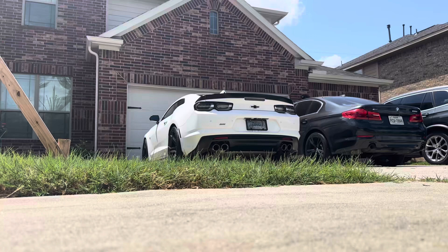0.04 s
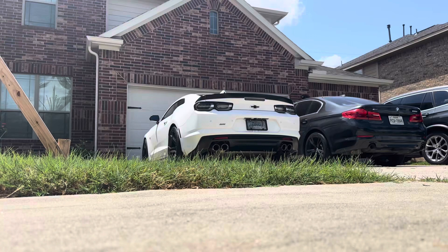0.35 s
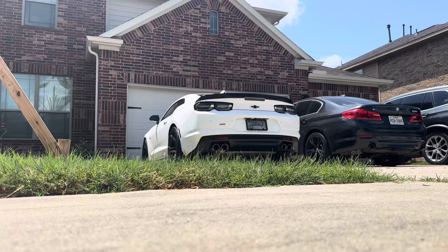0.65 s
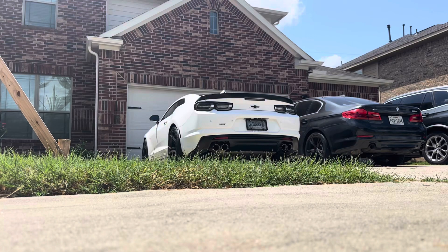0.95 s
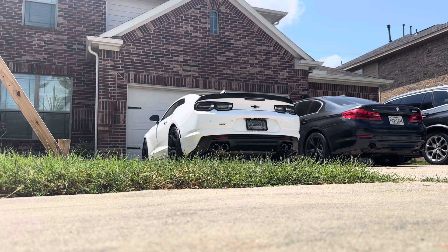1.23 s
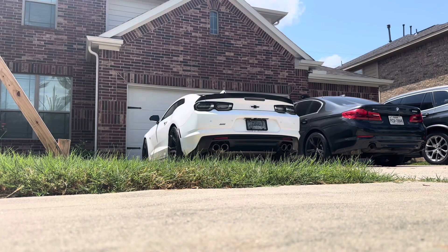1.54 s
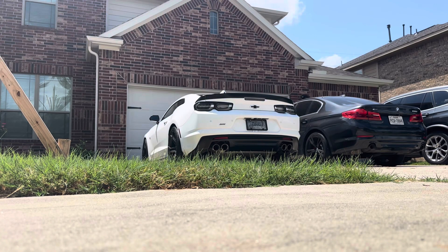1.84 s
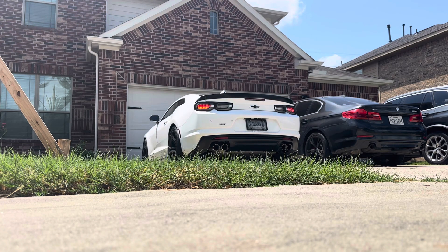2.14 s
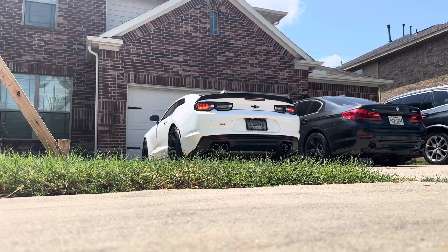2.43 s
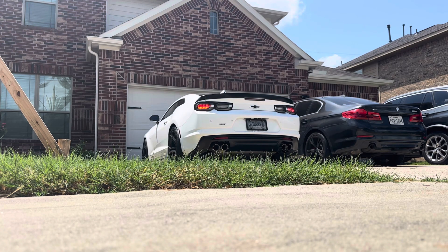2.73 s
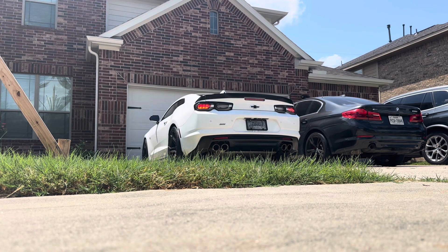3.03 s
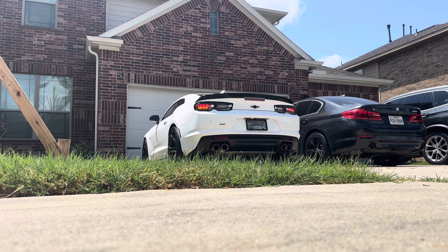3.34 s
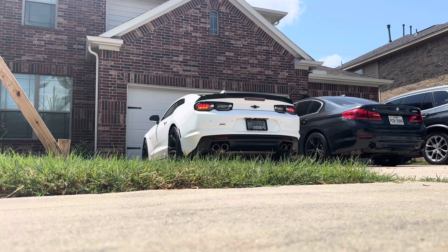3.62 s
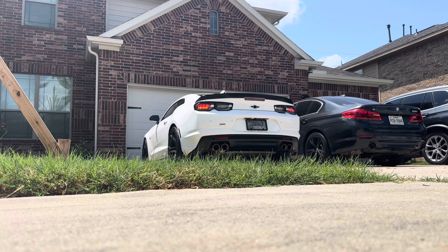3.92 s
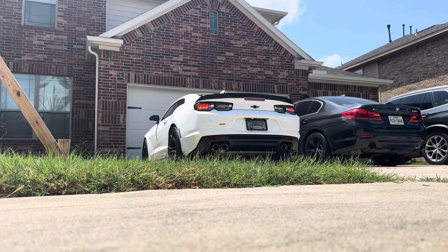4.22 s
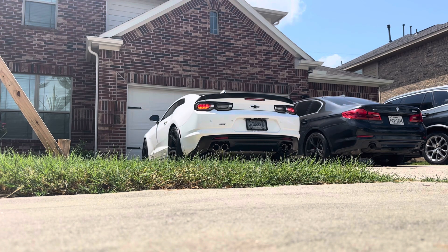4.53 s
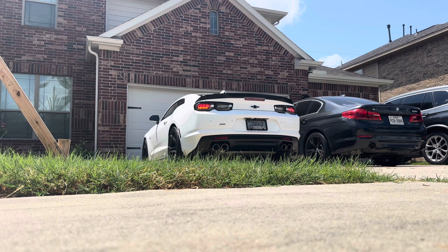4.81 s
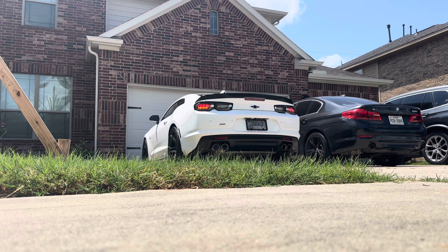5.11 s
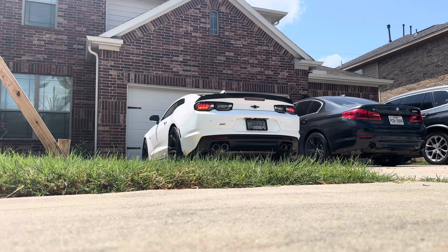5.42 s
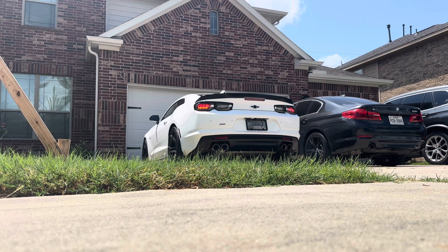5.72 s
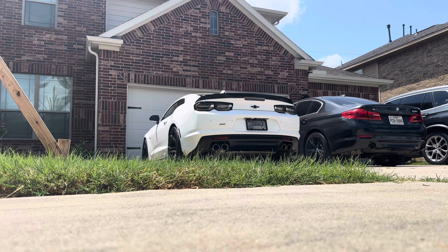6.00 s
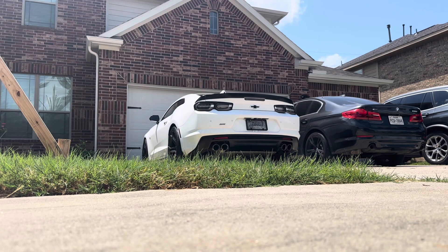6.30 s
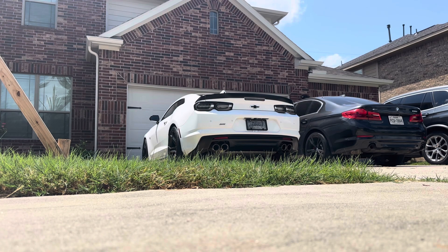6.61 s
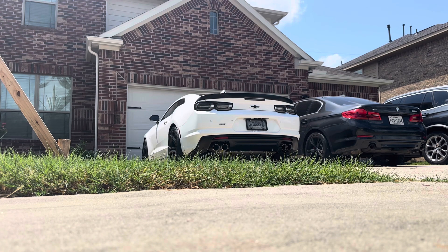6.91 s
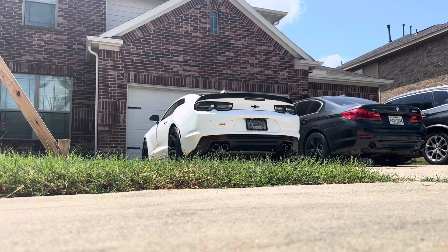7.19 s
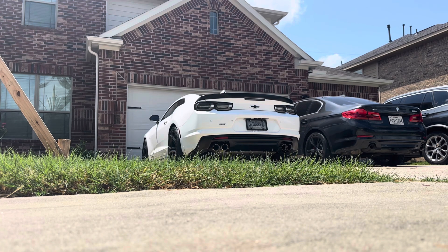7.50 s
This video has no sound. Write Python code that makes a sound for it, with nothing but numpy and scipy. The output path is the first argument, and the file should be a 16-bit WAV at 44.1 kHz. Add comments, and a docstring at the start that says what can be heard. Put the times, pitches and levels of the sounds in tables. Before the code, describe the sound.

For the first three seconds there is only quiet outdoor background: a faint hiss of cicadas and a low rumble of distant traffic, with a small bird chirping softly several times at the start and again near 1 and 2 seconds. At about 3.2 seconds a car's starter clunks in and cranks with a pulsing, grinding whine. At 4 seconds the V8 engine catches with deep thumps and flares loudly, spitting a rapid run of sharp exhaust cracks, loudest around 4.2 seconds. By 5 seconds the revs sink into a deep, burbling fast idle with a slight metallic rasp. The idle swells a little near 5.6 seconds, gives occasional light pops and slowly eases in pitch, still running at the end, around 7.5 seconds. A faint chirp comes near 6.4 seconds. The car is heard from behind in a driveway, with short reflections from nearby walls.

```python
"""A V8 car starts cold in a driveway: the starter clunks in and cranks, then the engine catches,
flares with sharp exhaust cracks and sinks to a burbling fast idle. Each firing sends out a puff
of gas that booms, rings the pipes and rasps; the starter's gear teeth grind and whine.
Brick house fronts throw the sound back. Behind it, cicadas buzz and a small bird chirps
over a faint town rumble."""
import sys
import numpy as np
from scipy import signal
from scipy.fft import rfft, irfft
from scipy.io import wavfile
from scipy.ndimage import uniform_filter1d

SR = 44100
rng = np.random.default_rng(int(sys.argv[2]) if len(sys.argv) > 2 else 0)


def persist_wave(psi):
    """Save psi, clipped to +-1, as 16-bit WAV."""
    counts = np.round(np.clip(psi, -1, 1) * 32767).astype(np.int16)
    wavfile.write(sys.argv[1], SR, np.atleast_2d(counts).T)


N = 332955
TIME = np.arange(N) / SR
FREQ = np.maximum(np.fft.rfftfreq(N, 1 / SR), 1)
SIDES = np.array([[1], [-1]])  # plus for left, minus for right

# tone of distant traffic: pitch_hz, level_db
TOWN_TONE = [(12, -54), (20, -27.5), (37, -10.5), (59, 1), (81, -7), (130, -7), (264, -19), (349, -19),
             (414, -23.5), (451, -24), (1210, -32), (1860, -38.5), (3400, -42), (4420, -75), (7480, -120)]
# tone of the far cicadas: pitch_hz, level_db
FAR_CICADA_TONE = [(2800, -23), (3500, -14), (4200, -3), (5000, -1.5), (6200, 2), (6900, -2), (7200, -3.5),
                   (7800, 0), (8400, -2.5), (9300, -9.5), (10200, -27), (12000, -56.5)]
# tone of the near cicadas: pitch_hz, level_db
NEAR_CICADA_TONE = [(3000, -31.5), (4200, -12), (5100, -7.5), (5550, 0), (6400, -2), (6900, -1.5),
                    (7200, -11), (8200, -6.5), (9300, -18.5), (11000, -53)]
# single cicadas whistling out of the chorus: loudest_s, pitch_hz, level_db
CICADA_WHISTLES = [(0.3, 7526, -78), (1.2, 6250, -73), (2.2, 5286, -78), (2.5, 8565, -80), (3.3, 6968, -72),
                   (3.4, 5855, -68), (3.6, 5373, -72), (3.7, 6245, -68), (3.7, 6880, -73), (3.7, 8016, -74),
                   (5.9, 8048, -72), (6, 5507, -69), (6.3, 6686, -69), (6.5, 5965, -61), (6.6, 6492, -66),
                   (6.9, 6288, -68), (6.9, 6778, -71), (7.1, 5561, -64)]
# the bird's chirps: start_s, length_s, top_pitch_hz, level_db
BIRD_CHIRPS = [(0.103, 0.014, 5280, -58), (0.178, 0.023, 4860, -60), (0.25, 0.023, 4800, -58),
               (0.304, 0.027, 5150, -56.5), (.38, 0.024, 4850, -57), (.945, .025, 4500, -66),
               (1.002, .025, 4600, -64), (1.917, 0.09, 4510, -55), (6.39, 0.07, 4503, -51)]

# the starter spins up, then sags and surges at each compression: time_s, tooth_rate_hz, level_db
STARTER_SPEED = [(3.19, 280, -48.5), (3.25, 479.5, -56), (3.32, 589, -52), (3.36, 621.4, -46.5),
                 (3.43, 587.3, -49), (3.49, 553.7, -44), (3.56, 525, -47.5), (3.635, 515.3, -54),
                 (3.675, 607, -44), (3.76, 539, -46.5), (3.81, 600, -44), (3.895, 545, -46.5),
                 (3.94, 595, -49.5), (4, 570, -45)]
# tones in the starter's whine: multiple_of_tooth_rate, level_db
WHINE_TONES = [(1, -10), (2, -6), (3, -15), (4, -16), (7, -20), (8, -20)]
# song of the starter motor's brushes: time_s, pitch_hz, level_db
BRUSH_SONG = [(3.19, 2700, -75), (3.25, 3650, -57), (3.285, 4800, -63), (3.32, 5520, -61),
              (3.37, 5600, -62), (3.41, 5000, -67), (3.46, 4650, -61), (3.52, 4200, -64), (3.57, 3600, -69),
              (3.63, 3650, -60), (3.69, 4200, -61), (3.73, 3650, -58), (3.77, 3560, -65), (3.81, 3680, -59),
              (3.86, 3630, -59), (3.9, 3550, -67), (4.0, 4000, -65)]
# ring of the housing around the gears: pitch_hz, width_hz, level_db
HOUSING_RING = [(205, 126, 6), (545, 38, 6.5), (690, 42, 6.5), (797, 19, 4), (998, 29, 10), (1137, 31, 6.5),
                (1200, 20, 3), (1370, 15, -8), (1813, 14, 2.5), (2030, 20, -5), (2370, 30, -18),
                (3500, 80, -23)]
# ring of the starter's casing: pitch_hz, width_hz, level_db
CASING_RING = [(215, 190, 3), (507, 130, 2), (790, 120, 1), (1222, 43, 4.5), (1370, 45, 1), (1766, 68, -2),
               (2025, 78, -3.5), (2300, 86, -12), (3670, 590, -16.5)]
# knocks of the starter drive: start_s, level_db, decay_s, brightness_hz
STARTER_KNOCKS = [(3.188, -36, 0.057, 6400), (3.216, -40.5, 0.085, 600), (3.465, -45, 0.074, 706),
                  (3.648, -40, 0.048, 4000), (3.776, -39.5, 0.043, 4000), (3.909, -38.5, 0.046, 5000),
                  (3.915, -32.5, 0.055, 550), (4.012, -23, 0.023, 2400)]
# short rings of the starter drive: start_s, pitch_hz, level_db, decay_s
STARTER_CLINKS = [(3.192, 2040, -43, .025), (3.535, 2080, -46.5, 0.028), (4.012, 2720, -34, 0.011)]

# the first firings thump out of the tailpipes: time_s, level_db, pitch_hz
FIRST_THUMPS = [(4.032, -11.5, 55.3), (4.054, -16, 60), (4.076, -7, 52), (4.110, -3.5, 72.4),
                (4.137, -10, 76.2)]
# engine speed, shooting up and then sinking towards idle: time_s, firing_rate_hz
ENGINE_SPEED = [(4.0, 48.07), (4.16, 90), (4.26, 105.1), (4.36, 108.4), (4.5, 104.8), (4.75, 94.05),
                (5, 90.84), (5.6, 87.36), (6.3, 85.26), (6.9, 84.91), (7.5, 81.3)]
# the eight cylinders' puffs in firing order: strength_db, delay_in_firings
CYLINDER_PUFFS = [(1, 0.1), (-4, 0.3175), (3, 0.14), (1.5, 0.4037), (0, 0.216), (2, 0.051), (1, 0.3646),
                  (1, 0.2)]
# tones of the boom; multiples of 8 are the firings, the rest the lope: multiple_of_cycle_rate, level_db
BOOM_TONES = [(6, -4.5), (8, 3), (10, -23.5), (11, -11), (12, -7), (13, -13.5), (14, -5), (15, -12.5),
              (16, -4.5), (17, -41), (18, -12), (19, -11.5), (20, -26), (22, -8), (24, -12), (25, -12.5),
              (26, -16), (27, -12.5), (32, -12.5)]
# what the muffler lets through: pitch_hz, gain_db
MUFFLER_TONE = [(40, 0), (150, -0.5), (195, -1), (215, 4), (235, -0.5), (255, 4.5), (285, -7), (315, -19),
                (345, 1), (400, -9.5)]
# echoes in the muffler's chambers: round_trip_s
CHAMBER_TRIPS = [.0013, .0021, .0034]
# tone of the low flutter of gas: pitch_hz, level_db
FLUTTER_TONE = [(25, 7), (45, 19), (65, 25), (110, 15), (200, 17.5), (265, 23.5), (320, 10), (500, -48)]
# tone of the rasping gas: pitch_hz, level_db
RASP_TONE = [(500, -12.5), (900, 19), (1050, 4), (1250, 10), (1800, 5), (2300, -1.5), (2750, -6),
             (3200, -8.5), (4200, -8), (6000, -19.5), (9000, -17), (15000, -70)]
# ring of the tailpipes at idle: pitch_hz, width_hz, level_db
IDLE_PIPE_RING = [(383, 35, -13.5), (428, 68, -9), (456, 14.3, 0.5), (559, 44, -6), (613.2, 20.5, 5),
                  (648.5, 23.3, 3.5), (717, 61, -8), (785, 40, -11), (833, 26, -1), (950, 45, -10),
                  (1070.1, 26, -13.5)]
# ring of the tailpipes in the hot blast of the flare: pitch_hz, width_hz, level_db
HOT_PIPE_RING = [(422, 42, -3.5), (474, 25, -9), (545, 42, -9.5), (643, 30, 8), (686, 40, 2.5),
                 (784, 34, -6.5), (834, 34, -2), (965, 54, -8), (1050, 34, -0.5)]
# ring of the thin metal exhaust tips: pitch_hz, width_hz, level_db
TIP_RING = [(1569, 75, 4), (2060, 59, 1.5), (2242, 230, 5.5), (2493, 86, 0.5), (2655, 34, 2)]
# single hard firings: time_s, strength_in_pipes_db, pop_peak_db
HARD_FIRINGS = [(4.043, 5.5, -24), (4.103, 5.5, -10.5), (4.171, 6.5, -10.5), (4.184, 5, -13),
                (4.220, 3.5, -13), (4.295, 8, -14), (4.371, 7, -15), (4.443, 2.5, -23), (4.907, 3, -21.5),
                (5.170, 4.5, -20.5), (5.373, -0.5, -27), (5.68, 2, -23.5), (5.826, 1, -24), (6.051, 2, -20),
                (7.040, 1, -23), (7.085, 3, -20.5)]
# tone of a hard firing's pop: pitch_hz, level_db
POP_TONE = [(250, -22), (450, -6), (650, 0), (880, 0), (1080, -7), (1350, -23), (2500, -27), (4000, -44),
            (12000, -70)]
# the loudest exhaust cracks: time_s, peak_db
LOUD_CRACKS = [(4.171, -4.5), (4.181, -10), (4.192, -9), (4.202, 0.5), (4.213, -5.5), (4.221, -6),
               (4.232, -9.5), (4.242, -2), (4.260, -5), (4.279, -4), (4.297, -7.5), (4.317, -10.5),
               (4.335, -16), (4.353, -13.5), (4.375, -17), (4.392, -16), (4.428, -15), (4.466, -22),
               (5.684, -24)]
# tone of one crack: pitch_hz, level_db
CRACK_TONE = [(300, -14), (700, 10), (1100, -1.5), (1600, 1), (2500, 0.5), (3300, -9), (5000, -20),
              (7000, -31), (10000, -44), (15000, -46)]

# what the house fronts throw back: pitch_hz, gain_db
WALL_ECHO = [(60, -31), (130, -44.5), (270, -9), (600, -12), (1100, -7.5), (2200, -6), (5000, -3.5),
             (12000, 4)]
# how the car and bird lean to one side: pitch_hz, left_minus_right_db
SIDE_LEAN = [(80, 0.5), (180, -1), (350, -1), (620, 0.5), (1200, -3), (2400, -5), (5000, -1.5)]

ENGAGE_S, CATCH_S, RELEASE_S = 3.19, 4.012, 4.03  # starter goes in, engine fires, starter lets go
PIPE_FLARE = dict(attack_s=0.145, hold_s=0.22, release_s=0.3)  # timing of the hot blast


def undb(db):
    """Turn decibels into a gain to multiply by."""
    return 10 ** (np.asarray(db) / 20)


def unit(x):
    """Scale a signal to an average (rms) level of 1."""
    return x / np.sqrt(np.mean(x ** 2))


def curves(table):
    """Join the rows of a time table into one curve for each column."""
    times, *columns = np.transpose(table)
    return [np.interp(TIME, times, column) for column in columns]


def spectrum(tone):
    """Spread a tone table over every frequency, in dB."""
    hz, db = np.transpose(tone)
    return np.interp(np.log(FREQ), np.log(hz), db)


def colour(x, tone):
    """Filter a signal so that it takes on the given tone."""
    cepstrum = irfft(np.log(undb(spectrum(tone))), N)
    # folding this in half makes the filter ring after a hit, never before it
    cepstrum[1:N // 2] *= 2
    cepstrum[N // 2:] = 0
    return irfft(rfft(x) * np.exp(rfft(cepstrum)), N)


def colour_hits(x, tone):
    """Give clicks a tone while a lone click keeps its peak height."""
    peak = np.abs(colour(1. * (TIME == 0), tone)).max()
    return colour(x, tone) / peak


def ring(x, modes):
    """Let a signal shake an object that rings at several pitches."""
    response = sum(undb(db) / (1 + 1j * hz / width * (FREQ / hz - hz / FREQ)) for hz, width, db in modes)
    return irfft(rfft(x) * response, N)


def noise():
    """White noise: an even hiss."""
    return rng.standard_normal(N)


def wander(rate_hz):
    """A smooth random wobble, about 1 in size."""
    size = int(SR / rate_hz)
    steps = np.repeat(rng.standard_normal(N // size + 1), size)[:N]
    return 1.198 * uniform_filter1d(steps, size)


def fade(start_s, decay_s):
    """A sudden rise that dies away."""
    return (TIME >= start_s) * np.exp(-np.clip((TIME - start_s) / decay_s, 0, 50))


def clicks(rows):
    """One click for each row of time_s, level_db."""
    out = np.zeros(N)
    for s, db in rows:
        out[int(s * SR)] += undb(db)
    return out


def scatter(x, tail_s):
    """A dense spray of echoes that falls by 60 dB in tail_s."""
    echoes = unit(fade(0, tail_s / np.log(1000)) * noise())
    return irfft(rfft(x) * rfft(echoes), N) / np.sqrt(N)


def flare(idle, rise, attack_s, hold_s, release_s):
    """A curve that follows the throttle: it opens as the engine catches, holds and closes to idle."""
    corners = CATCH_S + np.cumsum([0, attack_s, hold_s, release_s])
    return idle + rise * np.interp(TIME, corners, [0, 1, 1, 0])


def town(level_db=-49.5, left_db=1):
    """Steady distant traffic; its bass is alike on both sides."""
    middle = colour(noise(), TOWN_TONE)
    side = colour(colour(noise(), TOWN_TONE), [(60, -17.5), (250, -5.0), (1000, 3), (3000, 2.0)])
    return undb(level_db + SIDES * left_db / 2) * (middle + SIDES * side) / np.std(middle)


def chorus(tone, swing_db, loudest_s, period_s, mean_db=-56, buzz_hz=405):
    """Many cicadas buzz their drum-like skins, merging into a hiss that slowly swells and ebbs."""
    level_db = mean_db + swing_db * np.cos(2 * np.pi * (TIME - loudest_s) / period_s)
    buzz = 1 + 0.12 * np.sin(2 * np.pi * np.cumsum(buzz_hz * (1 + 0.0027 * wander(3.8))) / SR)
    song = noise()
    # many paths between the houses colour the hiss differently on each side
    hiss = np.array([0.94 * scatter(song, tail_s=0.22) + .5 * noise() + 0.295 * song for _ in range(2)])
    return undb(level_db) * unit(colour(buzz * hiss, tone))


def cicadas(whistle_s=1.5, left_db=4.3):
    """A far and a near chorus in the trees, in which thin, steady whistles come and go."""
    far = chorus(FAR_CICADA_TONE, swing_db=3.5, loudest_s=5, period_s=6)
    near = chorus(NEAR_CICADA_TONE, swing_db=9.5, loudest_s=8, period_s=11.5)
    out = far + near
    for s, hz, db in CICADA_WHISTLES:
        turns = np.cumsum(hz + 4 * wander(60)) / SR + rng.random((2, 1)) / 4
        swell = np.exp(-((TIME - s) / whistle_s) ** 2) * undb(db + 1.2 * wander(15))
        out += swell * np.sqrt(2) * np.sin(2 * np.pi * turns)
    return undb(SIDES * left_db / 2) * out


def bird(low_ratio=.84, low_db=-4, echo_db=-8):
    """Arched chirps from the two sides of a bird's voice box, with a soft echo from the street."""
    out = np.zeros(N)
    for s, length_s, top_hz, db in BIRD_CHIRPS:
        arch = np.linspace(-1, 1, int(length_s * SR)) ** 2  # 1 at the ends, 0 in the middle
        hz = top_hz * (1 - .18 * arch + .16 * rng.standard_normal(len(arch)))
        angle = 2 * np.pi * np.cumsum(hz) / SR
        voices = np.sin(angle) + undb(low_db) * np.sin(low_ratio * angle)
        start = int(s * SR)
        out[start:start + len(arch)] += undb(db) * (1 - arch) * voices
    return out + undb(echo_db) * scatter(out, tail_s=0.4)


def brushes(waver=.03, chatter_db=4):
    """The starter's brushes sing a thin, broken note that follows the motor's speed."""
    hz, db = curves(BRUSH_SONG)
    tone = np.sin(2 * np.pi * np.cumsum(hz * (1 + waver * wander(500))) / SR)
    return scatter(undb(db + chatter_db * wander(60)) * tone, tail_s=.04)


def starter(mesh_db=-5, chatter_db=4, whine_db=-3):
    """The starter's small gear grinds and whines on the flywheel, straining at each compression."""
    hz, db = curves(STARTER_SPEED)
    teeth = np.cumsum(hz * (1 + .025 * wander(120))) / SR
    tooth_hits = unit(np.diff(teeth.astype(int), prepend=0))
    scrape = noise() * undb(2.0 * wander(130))
    grind = unit(ring(undb(mesh_db) * tooth_hits + scrape, HOUSING_RING))
    whine = sum(undb(tone_db + chatter_db * wander(35)) * np.sin(2 * np.pi * multiple * teeth)
                for multiple, tone_db in WHINE_TONES)
    whine = undb(whine_db) * scatter(whine, tail_s=0.03)  # it bounces around under the car
    engaged = (TIME > ENGAGE_S) & (TIME < RELEASE_S)
    return engaged * (undb(db) * (grind + whine) + brushes())


def knocks(rise_s=0.0057):
    """The starter drive knocks and rattles its casing."""
    out = np.zeros(N)
    for s, db, decay_s, bright_hz in STARTER_KNOCKS:
        rattle = signal.lfilter(*signal.butter(2, bright_hz, fs=SR), ring(noise(), CASING_RING))
        out += undb(db) * (fade(s, decay_s) - fade(s, rise_s)) * unit(rattle)
    return out


def clinks():
    """Metal rings briefly as the starter's gear goes in, scrapes and is outrun by the engine."""
    return sum(undb(db) * fade(s, decay_s) * np.sin(2 * np.pi * hz * (TIME - s))
               for s, hz, db, decay_s in STARTER_CLINKS)


def chuffs(first_s=3.482, gap_s=0.097, first_db=-34, fall_db_per_s=15, gulp_hz=58, width_s=0.013):
    """Deep gulps from the tailpipes: air pumped at each compression, then the first firings."""
    gulps = [(s, first_db - fall_db_per_s * (s - first_s), gulp_hz)
             for s in np.arange(first_s, CATCH_S, gap_s)]
    return -sum(undb(db) * np.exp(-((TIME - s) / width_s) ** 2) * np.cos(2 * np.pi * hz * (TIME - s))
                for s, db, hz in gulps + FIRST_THUMPS)


def gas_hiss():
    """A fine hiss of rushing gas, strongest during the flare."""
    level_db = flare(-69, 21, attack_s=.03, hold_s=.36, release_s=.27)
    hiss = unit(colour(noise(), [(2000, -17), (6000, 8.5), (10000, -15.5), (15000, 3.5)]))
    return (TIME > CATCH_S) * undb(level_db) * hiss


def pops():
    """Hard firings burst straight out of the exhaust tips."""
    return colour_hits(clicks([(s, db) for s, _, db in HARD_FIRINGS]), POP_TONE)


def cracks(pulses, spread_db=3, spit_db=-20, spit_s=0.0032):
    """With the throttle open, firings sharpen into shock waves, each with a short spit of gas."""
    level_db = flare(-59, 34, attack_s=0.06, hold_s=0.03, release_s=1)
    shocks = pulses * undb(level_db + spread_db * noise())
    for s, db in LOUD_CRACKS:
        shocks[int(s * SR)] = undb(db)
    spit = signal.lfilter([1], [1, -np.exp(-1 / (spit_s * SR))], shocks)
    return colour_hits(shocks + undb(spit_db) * spit * noise(), CRACK_TONE)


def tip_zing(firings, relative_db=-5.5, spread_db=2.8):
    """Each firing makes the exhaust tips zing in a soft burst of its own size."""
    beat = firings + .12 * wander(60)
    size = undb(spread_db * rng.standard_normal(N // 100))[beat.astype(int)]
    bursts = size * (.3 + np.sin(np.pi * beat) ** 2)
    zing = signal.sosfilt(signal.butter(6, 3000, fs=SR, output="sos"), ring(bursts * noise(), TIP_RING))
    return undb(relative_db) * unit(zing)


def chambers(pulses, bounce=.5):
    """Echoes inside the muffler spread each pulse out in time."""
    trips = np.exp(-2j * np.pi * np.outer(CHAMBER_TRIPS, FREQ))
    return irfft(rfft(pulses) * np.prod((trips - bounce) / (1 - bounce * trips), axis=0), N)


def tailpipes(gas, firings, lump_db=.9, waver_db=.6):
    """Gas rings the pipes, swelling once a cycle; the hot blast of the flare tunes them a bit higher."""
    heat = flare(0, 0.92, **PIPE_FLARE)
    lump = np.cos(2 * np.pi * (firings / len(CYLINDER_PUFFS) - .3))
    gas = gas * undb(lump_db * lump + waver_db * wander(25))
    cool = np.sqrt(1 - heat) * unit(ring(gas, IDLE_PIPE_RING))
    hot = np.sqrt(heat) * unit(ring(gas, HOT_PIPE_RING))
    tone = [(150, -24), (300, -1.5), (380, 0.5), (460, 4), (950, -3.5), (1400, -19), (3000, -38)]
    return unit(colour(cool + hot, tone))


def boom(firings, waver_db=-0.5, unrest=.0022):
    """The deep beat: the two rows of cylinders fire unevenly, which gives a limping rhythm, the lope."""
    # open throttle evens out the lope; the negative hold starts the release part of the way through
    lope = undb(flare(2, -11, attack_s=0.13, hold_s=-0.2, release_s=1.6))
    cycles = firings / len(CYLINDER_PUFFS)
    out, power = 0, 0
    for multiple, db in BOOM_TONES:
        gain = undb(db) * (lope if multiple % len(CYLINDER_PUFFS) else 1)
        turns = multiple * (cycles + unrest * wander(20))  # uneven burning blurs high tones most
        out = out + gain * np.sin(2 * np.pi * (turns + rng.random()))
        power = power + gain ** 2 / 2
    return colour(out / np.sqrt(power) * undb(waver_db * wander(30)), MUFFLER_TONE)


def cylinders(firings, spread_db=1.0, puff_share=0.48, stream=0.77):
    """Each cylinder lets out a sharp pulse and a fading puff on top of a running stream of gas."""
    turn = np.arange(int(firings[-1]))
    size_luck, timing_luck = rng.standard_normal((N // 100, 2))[turn].T
    strength_db, delay = np.array(CYLINDER_PUFFS)[turn % len(CYLINDER_PUFFS)].T
    arrivals = np.sort(turn + delay + .014 * timing_luck)  # cold cylinders burn a bit early or late
    latest = np.maximum(np.searchsorted(arrivals, firings) - 1, 0)
    age = np.abs(firings - arrivals[latest])
    size = undb(strength_db + spread_db * size_luck)[latest]
    pulses = np.diff(latest, prepend=0) * size
    puffs = size * (np.exp(-age / puff_share) + stream)
    return pulses, puffs


def exhaust_gains(lull_s=.014, dip_db=-3.5, swell_s=5.62, swell_width_s=0.41):
    """How strongly the boom, the pipes' bark and the gas's rasp sound as the throttle moves."""
    # a weak firing leaves a short lull before each hard one
    lulls = sum(1. * (TIME > s - lull_s) * (TIME < s) for s, _, _ in HARD_FIRINGS)
    lull_db = dip_db * uniform_filter1d(lulls, size=100)
    swell_db = 2 * np.exp(-((TIME - swell_s) / swell_width_s) ** 2)  # one swell as the idle settles
    boom_db = flare(-20, 7, attack_s=0.18, hold_s=0.25, release_s=0.14)
    bark_db = flare(-29.5, 9.35, **PIPE_FLARE) + lull_db + swell_db
    rasp_db = flare(-44.5, 17.7, attack_s=0.14, hold_s=0.16, release_s=0.35) + lull_db
    return undb(boom_db), undb(bark_db), undb(rasp_db)


def engine(flutter_db=-13, swirl_db=-1.5, join_s=.075, growth_db_per_s=0.5149):
    """Each firing booms, rings the tailpipes and lets out a puff of rasping gas."""
    hz, = curves(ENGINE_SPEED)
    firings = np.cumsum(hz * (1 + 0.002992 * wander(18))) / SR  # running count of firings
    pulses, puffs = cylinders(firings)
    shocks = cracks(pulses)
    pulses = chambers(pulses) + clicks([(s, db) for s, db, _ in HARD_FIRINGS])
    flutter = undb(flutter_db) * unit(colour(puffs * noise(), FLUTTER_TONE))
    swirl = undb(swirl_db) * unit(puffs * noise())
    bark = tailpipes(unit(pulses) + swirl, firings)
    rounded_puffs = uniform_filter1d(puffs, size=110)  # the muffler softens each puff's edge
    rasp = unit(colour(rounded_puffs * noise(), RASP_TONE))
    boom_gain, bark_gain, rasp_gain = exhaust_gains()
    lows = boom_gain * (boom(firings) + flutter)
    highs = rasp_gain * (rasp + tip_zing(firings))
    # the engine fades in as the cylinders join, then slowly gains level
    running = np.clip((TIME - CATCH_S) / join_s, 0, 1) * undb(growth_db_per_s * (TIME - CATCH_S))
    return running * (lows + bark_gain * bark + highs + shocks)


def driveway(x, tail_s=0.06, first_echo_s=0.0045):
    """Walls and parked cars send different echoes to each side."""
    reflections = unit(fade(first_echo_s, tail_s / np.log(1000)) * noise() ** 3) / np.sqrt(N)
    echo = rfft(reflections) * undb(spectrum(WALL_ECHO))
    lean = undb(SIDES * spectrum(SIDE_LEAN) / 2)
    return irfft(rfft(x) * (1 + SIDES * echo) * lean, N)


def scene():
    """The car and the bird among the houses, over cicadas and town."""
    car = engine() + pops() + gas_hiss() + starter() + knocks() + clinks() + chuffs()
    fade_out = np.clip((TIME[-1] - TIME) / .006, 0, 1)
    return driveway(car * fade_out + bird()) + cicadas() + town()


def record(dry, low_cut_hz=33, ceiling=.93, top_hz=15400):
    """The phone thins the deepest bass, fades in, rounds the tallest peaks and cuts the top treble."""
    thinned = irfft(rfft(dry) / np.sqrt(1 + (low_cut_hz / FREQ) ** 8), N)
    faded = thinned * np.interp(TIME, [.03, .045], [0, 1])
    rounded = faded / (1 + (faded / ceiling) ** 6) ** (1 / 6)
    return signal.sosfilt(signal.ellip(8, .2, 70, top_hz, fs=SR, output="sos"), rounded)


dry = scene()
out = record(dry)
persist_wave(out)
```